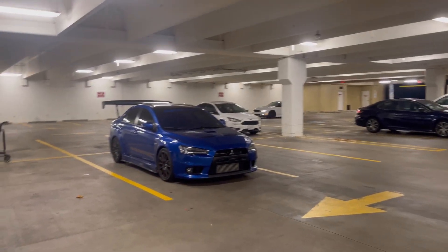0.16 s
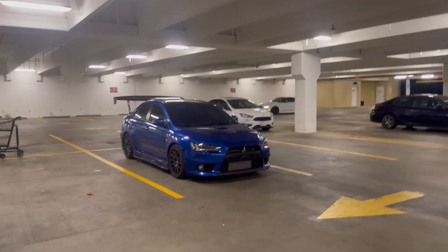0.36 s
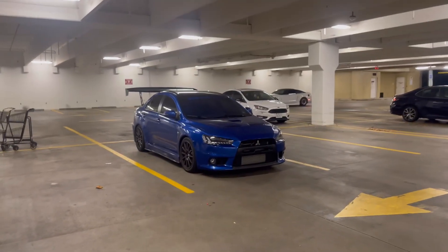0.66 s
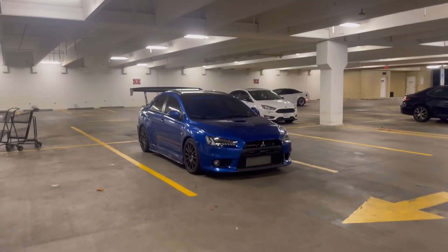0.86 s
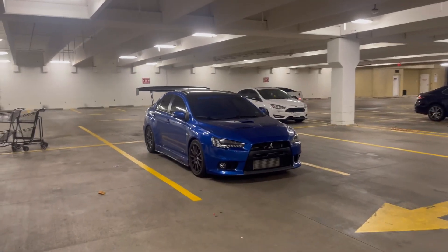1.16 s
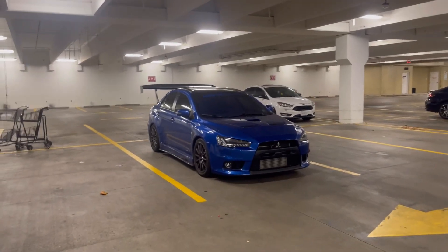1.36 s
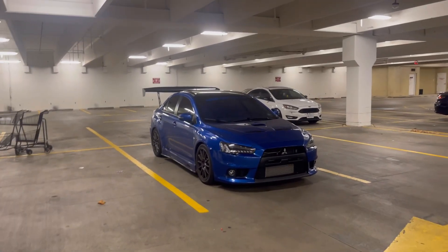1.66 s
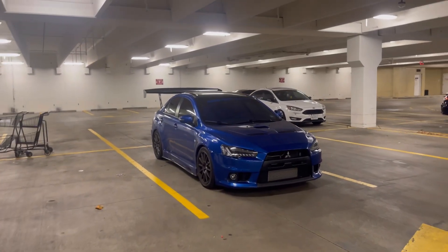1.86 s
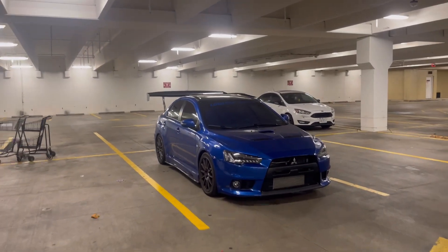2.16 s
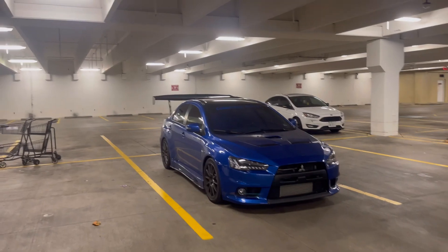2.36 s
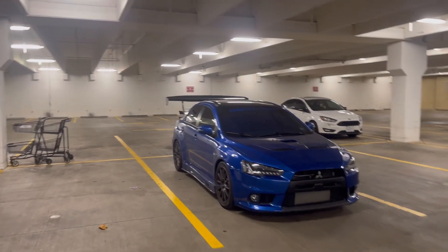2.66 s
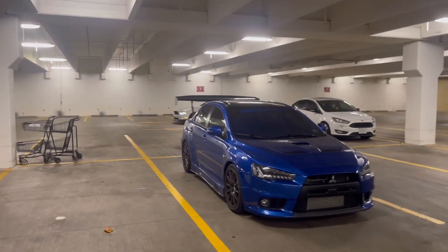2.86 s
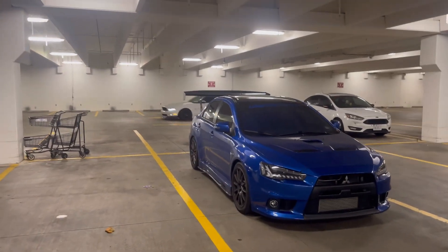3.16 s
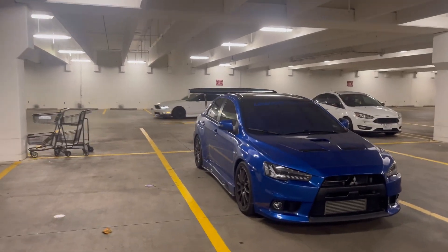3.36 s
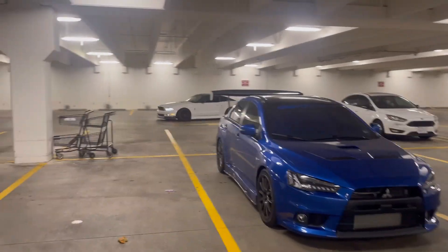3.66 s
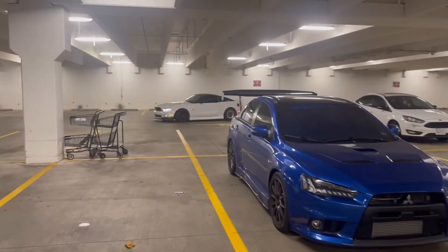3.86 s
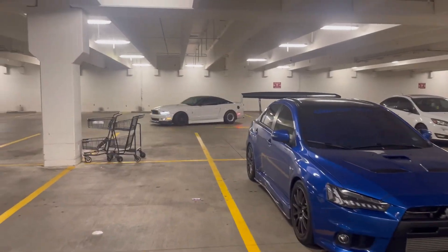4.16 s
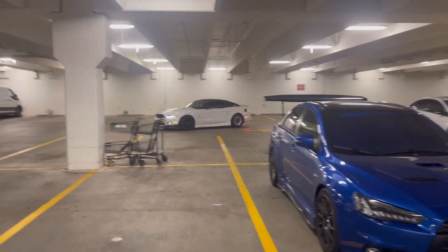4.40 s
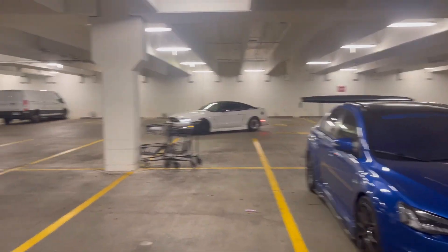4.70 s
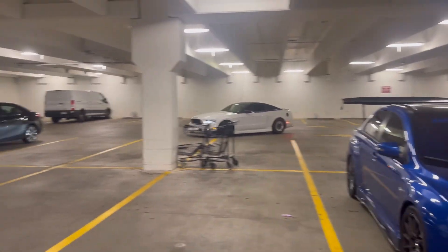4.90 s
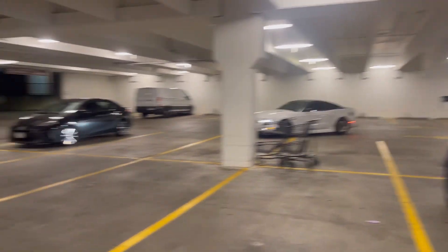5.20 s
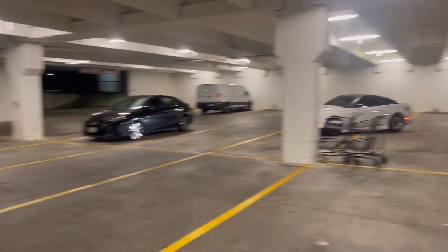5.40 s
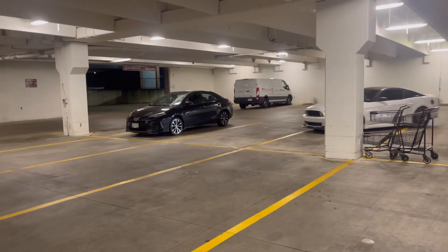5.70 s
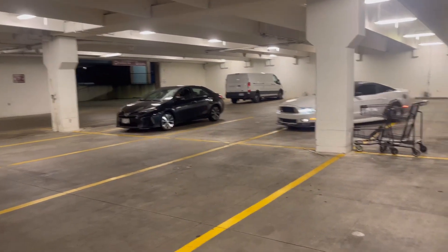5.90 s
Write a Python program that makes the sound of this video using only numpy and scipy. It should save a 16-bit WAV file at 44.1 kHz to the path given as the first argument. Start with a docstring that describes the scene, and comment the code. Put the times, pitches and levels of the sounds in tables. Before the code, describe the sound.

A turbocharged car rumbles slowly through an echoing concrete garage, belt whining, tiny brake squeaks, then a sudden raspy throttle dab with a brief hiss.

```python
"""Turbo car in a concrete garage

A turbocharged four-cylinder car creeps at a fast idle under a low concrete ceiling.
Pulses and puffs of noise through resonances make the exhaust and engine bay; sines make the drone.
Blurred tones make the belt whine, bands of noise the turbo's air, a wavering sine the brake squeaks.
Late firings thump; a dab of throttle swells the rumble, with a low rasp and a brief turbo hiss."""
import sys
import numpy as np
from scipy import signal
from scipy.fft import rfft, irfft, next_fast_len
from scipy.io import wavfile
from scipy.ndimage import uniform_filter1d, minimum_filter1d

SR = 44100
rng = np.random.default_rng(int(sys.argv[2]) if len(sys.argv) > 2 else 0)


def wav_out(sig):
    """Save sig, one row per channel (or a flat mono array), as 16-bit PCM at SR to the path in sys.argv[1]."""
    wavfile.write(sys.argv[1], SR, np.round(np.clip(np.atleast_2d(sig).T, -1, 1) * 32767).astype(np.int16))


N = 266364
TIME = np.arange(N) / SR
SIZE = next_fast_len(N, True)
BINS = np.fft.rfftfreq(SIZE, 1 / SR)  # Hz


def amp(db):
    """Decibels to gain."""
    return 10 ** (np.asarray(db) / 20)


def unit(x):
    """Scales to rms 1."""
    return x / np.sqrt(np.mean(x ** 2) + 1e-20)


def curves(rows):
    """Each column of a time table, joined by straight lines, sample by sample."""
    s, *columns = np.transpose(rows)
    return [np.interp(TIME, s, column) for column in columns]


def read(points, hz):
    """Reads a frequency table along a log-frequency axis."""
    table_hz, value = np.transpose(points)
    return np.interp(np.log(hz + 1), np.log(table_hz + 1), value)


def shaped(x, gain):
    """Filters by a gain for each frequency."""
    return irfft(rfft(x, SIZE) * gain, SIZE)[..., :N]


def below(x, edge_hz):
    """A steep low-pass."""
    return shaped(x, 1 / (1 + (BINS / edge_hz) ** 12))


def drift(rate_hz):
    """Random wander of rms 1; a lower rate wanders more slowly."""
    return unit(shaped(rng.standard_normal(N), np.exp(-(BINS / rate_hz) ** 2)))


def steady(x, seconds):
    """Evens out a stereo sound to about rms 1 over the given time."""
    size = max(int(seconds * SR), 8)
    power = uniform_filter1d(uniform_filter1d((x ** 2).mean(0), size), size)
    return x / np.sqrt(abs(power) + 1e-12)


# How alike the left and right channels sound: freq_hz, likeness (0 to 1)
LIKENESS = [(60, .992), (150, .98), (330, .96), (550, .72), (1200, .5), (2500, .56), (5000, .72),
            (9000, .8)]
# Phase offset between left and right channels, which shapes the stereo width: freq_hz, offset_radians
PHASE_OFFSET = [(40, 0), (110, -.17), (380, -.17), (750, .8), (1100, .8), (1400, -.1), (2000, -.4),
                (2900, 1.4), (3800, .4), (6700, .2), (7500, 1.1), (8600, 0), (10250, -3.1), (11700, -6.2)]
# How much louder the left channel is: freq_hz, left_minus_right_db
SIDE_DB = [(60, 0), (130, -0.5), (300, -1.5), (450, -2.5), (700, 1), (1200, 1.2), (2000, 0.5), (3400, 2),
           (6000, 5.5), (8500, 0), (12000, 0)]


def ports(pair):
    """Two unrelated sounds become a stereo pair with set likeness, phase offset and level difference."""
    a, b = rfft(pair, SIZE)
    same = np.clip(read(LIKENESS, BINS), 0, 1)
    mixed = same * a + np.sqrt(1 - same ** 2) * b
    right = mixed * np.exp(-1j * read(PHASE_OFFSET, BINS))
    tilt = amp(read(SIDE_DB, BINS) / 2)
    return irfft(np.array([a * tilt, right / tilt]), SIZE)[:, :N]


def one_wave(x):
    """A single wave that reaches both channels."""
    return ports(np.array([x, np.zeros(N)]))


# How long the concrete rings, as the time to fall 60 dB: freq_hz, decay_s
GARAGE = [(60, 1.4), (300, 1.15), (1000, 1.5), (4000, 0.69), (12000, 0.58)]


def garage(x, direct_db):
    """The direct sound and a dense noise tail that fades at its own speed for each pitch."""
    hz, t, z = signal.stft(rng.standard_normal((2, 2 * SR)), SR, nperseg=512)
    fade = amp(-60 * t / read(GARAGE, hz)[:, None])
    tail = signal.istft(z * fade, SR, nperseg=512)[1]
    tail /= np.linalg.norm(tail[0])
    tail[0, 0] += amp(direct_db)
    tail[1] *= np.sqrt(1 + amp(direct_db) ** 2)  # as strong as direct sound plus tail
    return ports(shaped(x, rfft(tail, SIZE)))


def rolling(x, direct_db, places_hz=0.4632, count=3):
    """As the car rolls, its sound passes from one set of echoes to the next."""
    weights = [np.cos(np.pi * (places_hz * TIME + k / count)) ** 4 for k in range(count)]
    return sum(garage(x * weight, direct_db) for weight in weights)


def puffs(cycles, decay, between):
    """Noise that bursts once a cycle, over a constant floor; decay is a share of the cycle."""
    burst = np.exp(-(cycles % 1) / decay)
    return unit((between + burst) * rng.standard_normal(N))


# The car rolls through the garage's deepest standing wave, heard on the firing tone: time_s, level_db
BOOM = [(0.0, -35.0), (0.21, -37.5), (0.39, -30.5), (0.69, -40.5), (1.29, -37.0), (1.41, -25.5),
        (1.56, -23.5), (1.68, -29.0), (1.89, -24.0), (2.16, -33.5), (2.31, -22.0), (2.55, -26.5),
        (2.67, -42.5), (3.0, -27.5), (3.45, -38.0), (3.6, -30.5), (4.02, -30.0), (4.2, -40.0),
        (4.32, -27.0), (4.98, -37.5), (5.19, -44.0), (5.52, -33.0), (5.85, -43.5), (6.03, -35.5)]
# Tones at two, three and four times the firing rate swell and fade too: time_s, level_db
SECOND_ORDER = [(0.0, -24.5), (0.33, -41.0), (0.42, -23.5), (0.54, -32.5), (1.26, -25.0), (1.77, -33.0),
                (2.37, -24.5), (2.46, -30.5), (3.09, -31.0), (3.51, -40.5), (3.6, -32.5), (3.93, -41.5),
                (4.11, -35.5), (6.03, -31.0)]
THIRD_ORDER = [(0.0, -21.0), (0.42, -27.5), (0.54, -20.5), (1.32, -25.0), (1.47, -20.0), (2.01, -34.5),
               (2.16, -24.5), (2.76, -22.5), (2.85, -30.5), (3.3, -21.5), (3.75, -23.0), (3.81, -29.5),
               (3.99, -23.0), (4.74, -28.0), (5.1, -28.0), (5.16, -19.5), (5.28, -32.0), (5.37, -19.0),
               (5.49, -34.0), (6.03, -35.0)]
FOURTH_ORDER = [(0.0, -25.0), (0.12, -30.0), (0.63, -16.5), (1.17, -27.0), (1.26, -20.0), (1.71, -25.5),
                (1.89, -20.5), (2.13, -32.0), (2.43, -21.0), (2.7, -22.0), (2.91, -36.0), (3.15, -24.5),
                (4.08, -34.0), (4.23, -28.0), (4.77, -37.5), (5.19, -19.5), (5.46, -26.5), (5.55, -20.0),
                (5.64, -30.5), (5.79, -22.0), (5.91, -32.5), (6.03, -22.5)]


def drone(firings):
    """The lowest firing orders stand in the garage as tones; the higher ones waver more."""
    waver_radians, waver_hz = .17, 7
    flutter_db, flutter_hz = 2.2, 12
    tones = np.zeros(N)
    for order, table in enumerate((BOOM, SECOND_ORDER, THIRD_ORDER, FOURTH_ORDER), 1):
        level_db = curves(table)[0] + flutter_db * drift(flutter_hz)
        angle = 2 * np.pi * (order * firings + rng.random())
        tones += amp(level_db) * np.sin(angle + order * waver_radians * drift(waver_hz))
    return np.sqrt(2) * one_wave(tones)


def pipe_ring(firings, rate):
    """Whichever firing order meets the pipe's sharpest resonance sings out as a clean tone."""
    ring_hz, width_hz = 308, 5
    level_db, flutter_db = -.5, 3.5  # level is against the rest of the bark
    waver_radians = .55
    tones = np.zeros(N)
    for order in (5, 6, 7):
        closeness = np.exp(-.5 * ((order * rate - ring_hz) / width_hz) ** 2)
        tones += closeness * np.sin(2 * np.pi * order * firings + waver_radians * drift(13))
    return np.sqrt(2) * amp(level_db + flutter_db * drift(9)) * tones


# Voices that open up with load: coasting_db, db_per_db_of_effort, db_per_extra_firing_per_s
BARK = (-21.5, 0.67, -0.12)
RASP = (-36, 1, 0.018)
IDLE_RATE = 50  # firings per second


def follow(law, effort_db, rate):
    """Level of one exhaust voice: it grows with effort and shifts with engine speed."""
    coasting_db, per_effort, per_firing = law
    return coasting_db + per_effort * effort_db + per_firing * (rate - IDLE_RATE)


# Tone colour of the exhaust pipe and car body: freq_hz, gain_db
PIPE = [(10, -50), (25, -24), (60, -12.5), (80, -12), (100, -3.5), (130, 2.5), (150, 0), (185, -1.5),
        (225, 3.5), (255, 1), (280, 2.5), (312, 3.5), (335, 3), (375, 0.5), (425, -7), (465, -9.5),
        (530, -18.5), (700, -30), (1100, -63), (4000, -110)]
# Strength of each cylinder, in firing order: strength_db
CYLINDERS_DB = [-0.2, -2.2, -2.4, -2]


def exhaust(firings, ring, rumble_db, bark_db, rasp_db):
    """Each firing sends a pulse and a puff of gas down the pipe, split into rumble, bark and rasp."""
    rough = 0.58  # share of puffs against pulses
    jitter, uneven_db = 0.042, 3.5  # timing wander in firings, random strength of each firing
    bark_hz, rasp_hz = 250, 385  # where bark and rasp begin
    wandering = firings + jitter * drift(25)
    at = np.flatnonzero(np.diff(np.floor(wandering)) > 0)
    strength_db = np.resize(CYLINDERS_DB, len(at)) + uneven_db * rng.standard_normal(len(at))
    pulses = np.zeros(N)
    pulses[at] = amp(strength_db)
    drive = (1 - rough) * unit(pulses) + rough * puffs(firings, decay=0.35, between=0.11)
    pipe = shaped(rolling(drive, direct_db=-5.0), amp(read(PIPE, BINS)))
    low = below(pipe, bark_hz)
    body = below(pipe, rasp_hz)
    rumble = steady(low, seconds=0.15)
    bark = steady(steady(body - low, seconds=0.12) + one_wave(ring), seconds=0.13)
    rasp = steady(pipe - body, seconds=0.099)
    return amp(rumble_db) * rumble + amp(bark_db) * bark + amp(rasp_db) * rasp


# Tone colour of the engine bay: freq_hz, gain_db
BLOCK = [(250, -15), (500, -1.5), (630, 5.5), (700, 3.5), (810, -3.5), (970, 0), (1150, -3.5), (1420, -4),
         (1750, -9.5), (1980, -9), (2130, -4.5), (2290, -10), (2650, -11), (3100, -16.5), (3600, -18),
         (5000, -27), (10000, -45), (13000, -80)]


def clatter(firings, level_db):
    """Valves and injectors tick in the engine bay, twice a firing."""
    bay = rolling(puffs(2 * firings, decay=0.12, between=0.27), direct_db=-1)
    return amp(level_db) * steady(shaped(bay, amp(read(BLOCK, BINS))), seconds=.3)


# Tone colour of the turbo intake: freq_hz, gain_db
AIR = [(1000, -12), (2200, 0), (3200, 1), (4000, 0), (5000, 0), (7000, -3), (8000, 0), (9000, 2),
       (9700, -2), (10400, -9), (11400, -9), (12200, -20), (12800, -45)]


def intake(firings, level_db):
    """Air drawn through the turbo hisses, pulsing a little with the firings."""
    air = garage(puffs(firings, decay=0.98, between=1.0), direct_db=9.0)
    return amp(level_db) * unit(shaped(air, amp(read(AIR, BINS))))


def fuzzy(angle, core_hz, skirt_hz, skirt):
    """A tone smeared by echoes into a narrow core and a wider skirt, once for each channel."""
    core = np.exp(-(BINS / core_hz) ** 2) / np.sqrt(core_hz)
    edges = np.exp(-(BINS / skirt_hz) ** 2) / np.sqrt(skirt_hz)
    a, b = shaped(rng.standard_normal((2, 2, N)), core + skirt * edges)
    return unit(a * np.cos(angle) + b * np.sin(angle))


# The belt drive's song: time_s, pitch_hz, level_db, upper_notes_against_main_note_db
WHINE = [(0, 963, -41, -11.5), (.45, 1029, -48, -14), (1.05, 1120, -47, -4), (1.2, 1150, -41, -3),
         (1.5, 1170, -36.5, -2), (2.1, 1203, -39, 1), (2.85, 1169, -38.5, 1), (3.3, 1138, -40.5, -7),
         (4, 1075, -41.5, 0), (4.68, 1075, -45, -3), (4.93, 1068, -38.5, -10.5), (5.02, 1510, -35.5, -5),
         (5.18, 1445, -35, -8), (5.4, 1410, -37.5, -11), (5.51, 1460, -35, -11), (5.7, 1415, -38, -7),
         (6.04, 1390, -39, -6)]
# Notes just above the main one: multiple_of_pitch, level_db
UPPER_NOTES = [(1.09, 0), (1.2, -11)]
# Overtones: multiple_of_pitch, level_db
OVERTONES = [(2, 0), (3, -3.5)]


def whine(near_db):
    """The belt drive sings a main note, fluttering notes above it and overtones the bay colours."""
    bay_share = .65  # how strongly the engine bay colours the overtones
    overtone_db, near_share = -44, 0.64  # overtone base level, dB gained per dB of nearness
    hz, level_db, upper_db = curves(WHINE)
    angle = 2 * np.pi * np.cumsum(hz * (1 + 0.00503 * drift(6.87))) / SR
    main = fuzzy(angle, core_hz=34, skirt_hz=130, skirt=1)
    upper = 0
    for multiple, db in UPPER_NOTES:
        note = fuzzy(multiple * angle, core_hz=38, skirt_hz=110, skirt=.8)
        upper = upper + amp(db + 3 * drift(14)) * note
    cluster = steady(main + amp(upper_db) * upper, seconds=.085)
    overtones = 0
    for multiple, db in OVERTONES:
        colour_db = bay_share * read(BLOCK, multiple * hz)
        note = fuzzy(multiple * angle, core_hz=65, skirt_hz=300, skirt=1)
        overtones = overtones + amp(db + colour_db + 2 * drift(20)) * note
    notes = amp(level_db + .7 * drift(9.8)) * cluster
    return ports(notes + amp(overtone_db + near_share * near_db) * overtones)


# Bands of rushing noise: turbo air, and a low rasp of exhaust at the throttle dab:
# peak_s, level_db, rise_s, decay_s, centre_hz, width_octaves
NOISE_BANDS = [(1.38, -53, .08, .15, 9000, 0.21), (1.46, -47.5, 0.14, 0.39, 3000, 0.81),
               (1.83, -37, .055, .06, 1680, .3), (1.81, -48, .04, .07, 5200, .38),
               (2.87, -54, .045, .069, 6000, .57), (4.9, -46, .06, .06, 5500, .7),
               (4.88, -39, .09, .08, 1000, .17), (5.005, -30, .035, .04, 1000, .18),
               (5.075, -28.5, .018, .05, 960, .16), (5.085, -35, 0.025, 0.04, 1590, 0.019),
               (5.12, -22.5, .06, .09, 450, .28), (5.08, -30, 0.089, 0.1, 1070, 1),
               (5.03, -31.8, .048, .075, 4000, .92), (5.1, -34, .025, .035, 4200, .85),
               (5.185, -39.5, .025, .03, 5000, .75), (5.045, -29, .05, .09, 9230, .2),
               (5.46, -39, 0.014, 0.11, 1800, 0.37)]


def rushing_noise():
    """Turbo air and a low exhaust rasp: noise bands that swell quickly, surge unevenly and fade."""
    surge_db, surge_hz = .8, 70
    out = np.zeros((2, N))
    for s, db, rise, decay, hz, octaves in NOISE_BANDS:
        band = np.exp(-.5 * (np.log2((BINS + 1) / hz) / octaves) ** 2)
        before, after = np.minimum(TIME - s, 0), np.maximum(TIME - s, 0)
        swell = np.exp(-(before / rise) ** 2 / 2 - after / decay)
        out += amp(db) * swell * unit(shaped(rng.standard_normal((2, N)), band))
    return ports(out * amp(surge_db * drift(surge_hz)))


# Now and then a firing burns late and thumps out of the tailpipe: start_s, peak_db
BURBLES = [(1.757, -11), (1.863, -10), (2.049, -7.5), (2.245, -8), (5.357, -8), (5.544, -9), (5.677, -8),
           (5.794, -11), (5.862, -10)]


def burbles(hz=270, swell_s=.003):
    """A late firing gives the pipe one short, heavily damped thump."""
    out = np.zeros(N)
    for s, db in BURBLES:
        age = np.maximum(TIME - s, 0)
        swell = age / swell_s * np.exp(1 - np.minimum(age / swell_s, 20))
        out += amp(db) * swell * np.sin(2 * np.pi * hz * age)
    return one_wave(out)


# Brake squeaks: start_s, length_s, level_db, rise_s, fall_over_length_db
SQUEAKS = [(3.85, .5, -54, .03, 2), (3.968, .062, -38.5, .012, 2), (4.095, .045, -46, .02, 0),
           (4.157, .048, -33.5, .002, 7)]


def brake():
    """A pad catches on its disc and rings one high mode, which lingers faintly in the garage."""
    squeak_hz, waver_hz = 8965, 14
    release_s, chatter_db = 0.0099, 2.5
    level = np.zeros(N)
    for s, length, db, rise, fall_db in SQUEAKS:
        age = np.maximum(TIME - s, 0)
        fade_in = np.clip(age / rise, 0, 1)
        fade_out = np.clip((length - age) / release_s, 0, 1)
        level += amp(db - fall_db * age / length) * fade_in * fade_out
    level *= amp(chatter_db * drift(50))
    angle = 2 * np.pi * np.cumsum(squeak_hz + waver_hz * drift(100)) / SR
    squeak = np.sqrt(2) * level * np.sin(angle)
    return one_wave(squeak) + amp(-13) * garage(squeak, direct_db=-40)


# Engine speed: time_s, firings_per_s
SPEED = [(0, 47.5), (.55, 53.3), (1, 55.3), (1.6, 56.2), (1.95, 55.6), (2.25, 53.6), (2.5, 51.5), (3.1, 49),
         (3.7, 45.9), (4.25, 44.6), (4.42, 43.8), (4.7, 44), (4.9, 43.2), (5.1, 61.2), (5.3, 61.3),
         (6.04, 57.5)]
# The driver pulls away, coasts, loads the engine again and dabs the throttle:
# time_s, effort_against_coasting_db
EFFORT = [(0, 2), (.22, 8), (.45, 6.5), (.7, 6.5), (1.08, 9.5), (1.4, 5), (1.7, 2.5), (1.97, -0.5),
          (2.3, 2), (2.7, 1), (3.15, 0), (3.45, -4), (4, .5), (4.2, 1.5), (4.3, 8.5), (4.62, 11),
          (4.92, 3.5), (5.02, 14), (5.22, 16.5), (5.39, 2.5), (5.51, 12), (5.7, 1), (6.04, 1.5)]
# The car's nose comes closer, then passes the microphone: time_s, nearness_db
NEARNESS = [(0, -7), (1.05, -7.5), (2.2, -5.5), (4, -1), (4.8, -0.5), (5.5, 1.5), (5.73, -6), (6.04, -5)]
# The exhaust's deep rumble: time_s, level_db
RUMBLE = [(0, -16), (.06, -20), (.27, -18.5), (.78, -22), (.96, -17), (1.14, -22), (1.35, -21), (1.71, -23),
          (3.15, -22), (3.6, -23.5), (3.93, -22), (4.29, -23), (4.89, -22), (5, -14), (5.1, -13.5),
          (5.28, -18.5), (5.67, -18), (6.04, -20)]
# The engine bay's clatter: time_s, level_db
CLATTER = [(0, -36), (1.1, -37.5), (1.5, -36), (2.2, -36.5), (4, -35.5), (4.8, -34), (5.5, -35),
           (5.75, -39), (6.04, -39.5)]


def scene():
    """One count of firings times exhaust, clatter and intake; effort and nearness set levels."""
    air_db = -44.5  # intake level at 0 dB nearness
    throb_db, throb_hz = .9, 14  # uneven combustion makes the exhaust throb
    tables = (SPEED, EFFORT, NEARNESS, RUMBLE, CLATTER)
    rate, effort_db, near_db, rumble_db, clatter_db = [curves(table)[0] for table in tables]
    firings = np.cumsum(rate * (1 + .004 * drift(8))) / SR
    bark_db = follow(BARK, effort_db, rate)
    rasp_db = follow(RASP, effort_db, rate)
    ring = pipe_ring(firings, rate)
    tailpipe = drone(firings) + exhaust(firings, ring, rumble_db, bark_db, rasp_db)
    tailpipe = tailpipe * amp(throb_db * drift(throb_hz))
    bay = clatter(firings, clatter_db) + intake(firings, air_db + near_db) + whine(near_db)
    return tailpipe + bay + rushing_noise() + burbles() + brake()


def record(dry, ceiling=0.87):
    """A quick limiter rides the highest peaks; then soft ends and a treble cut."""
    room = np.minimum(1, ceiling / (abs(dry).max(0) + 1e-9))
    limited = dry * uniform_filter1d(minimum_filter1d(room, size=220), size=220)
    limited = limited * signal.windows.tukey(N, .001)
    low_pass = signal.firwin(511, 13400, window=("kaiser", 9), fs=SR)  # edge in Hz
    return signal.oaconvolve(limited, low_pass[None], "same")


dry = scene()
out = record(dry)
wav_out(out)
```